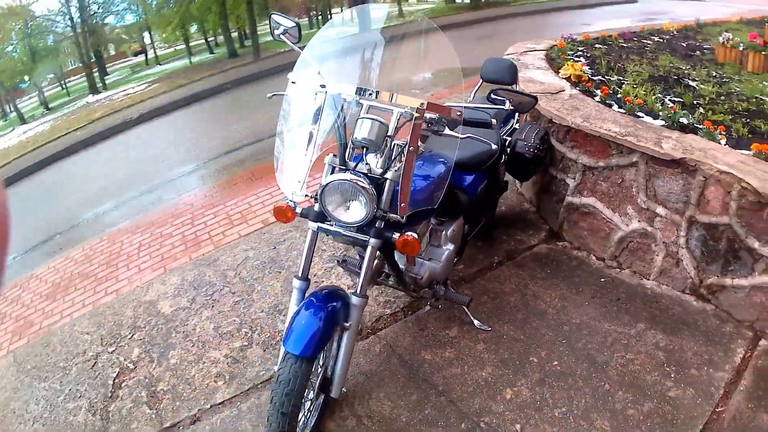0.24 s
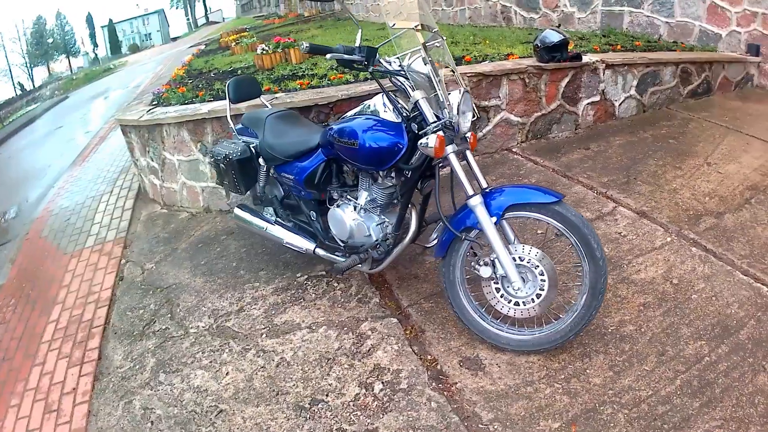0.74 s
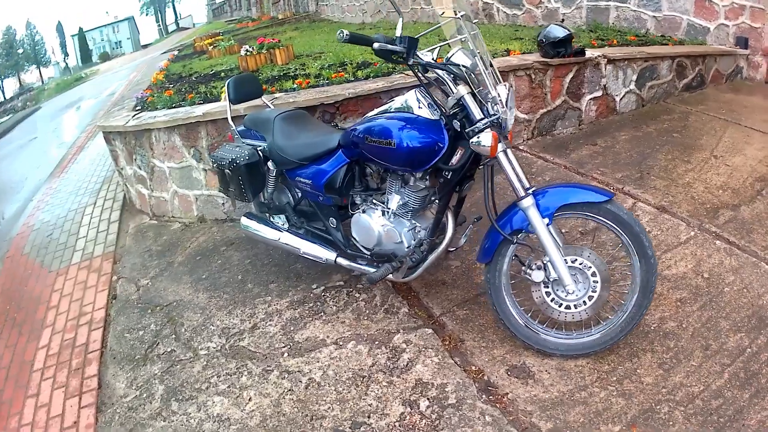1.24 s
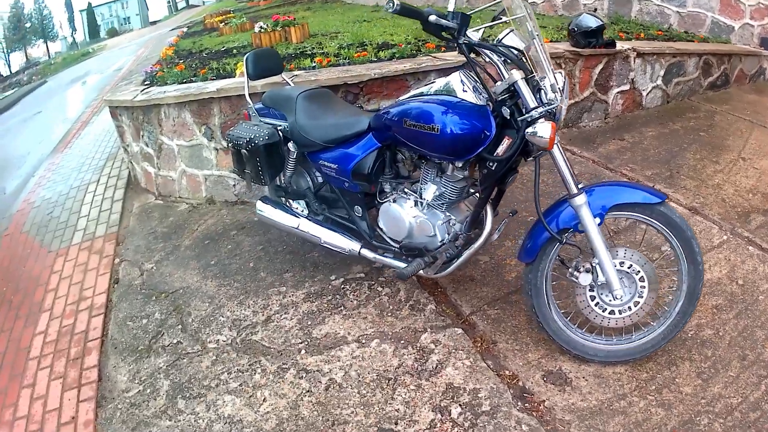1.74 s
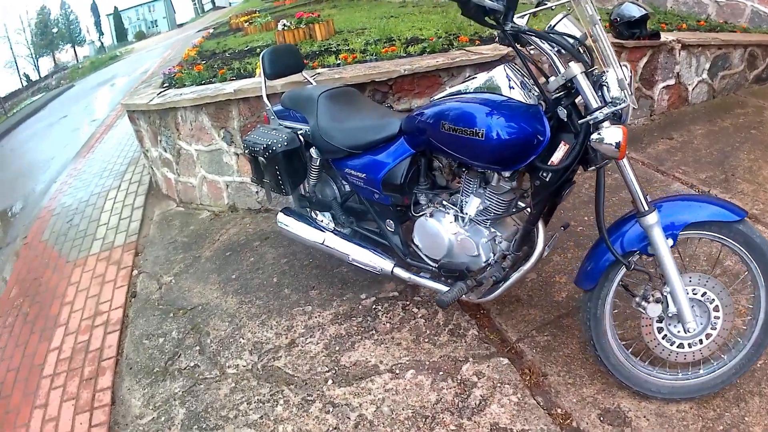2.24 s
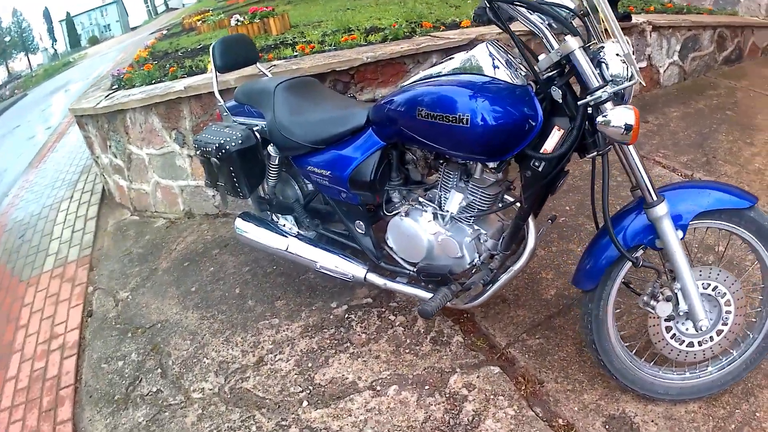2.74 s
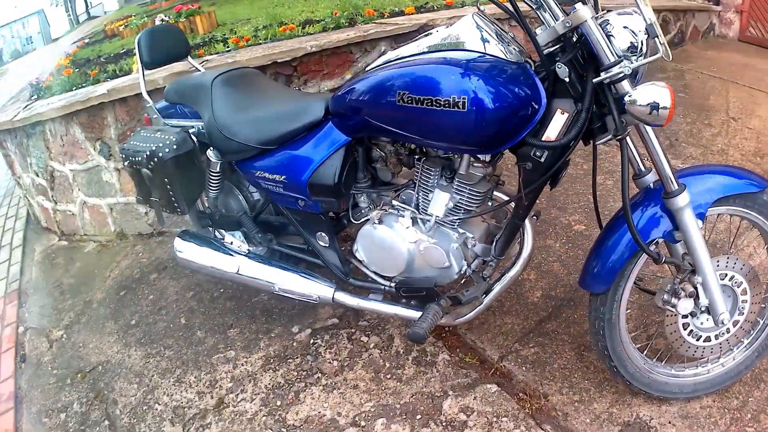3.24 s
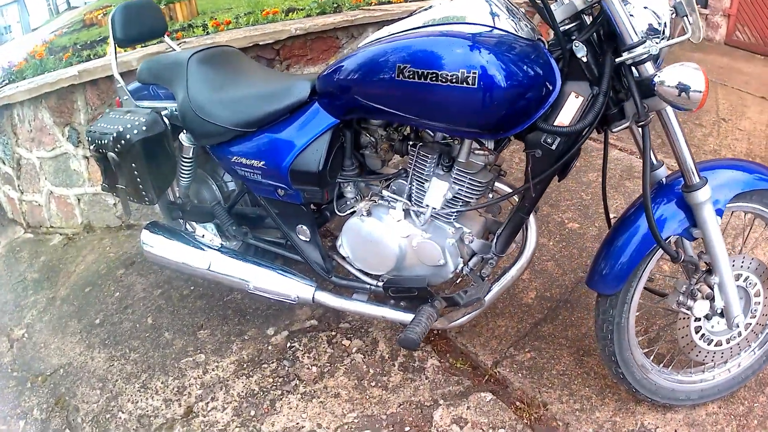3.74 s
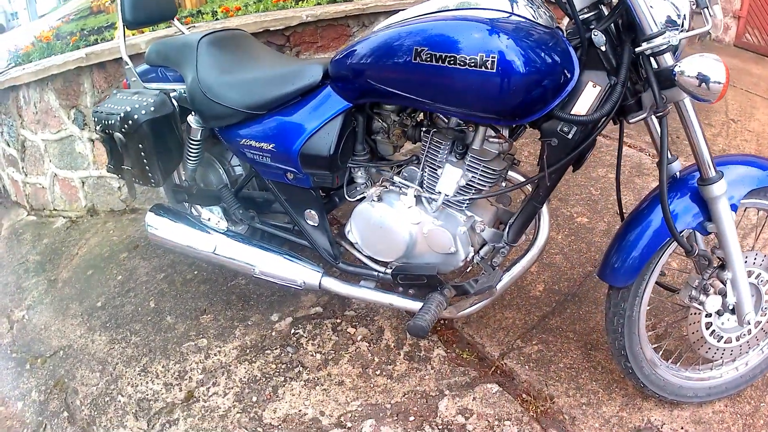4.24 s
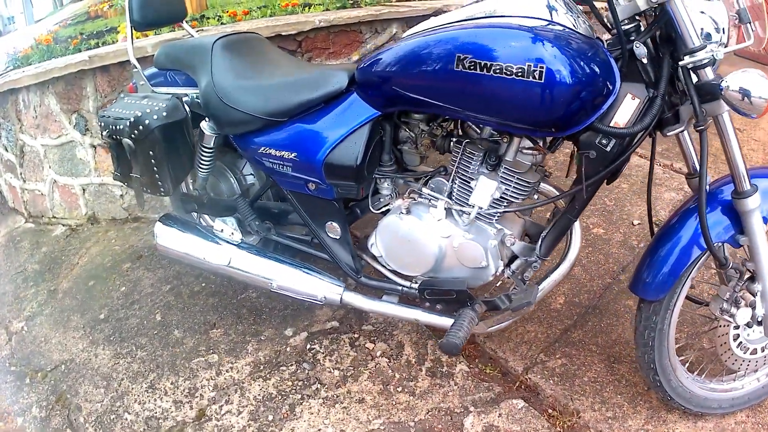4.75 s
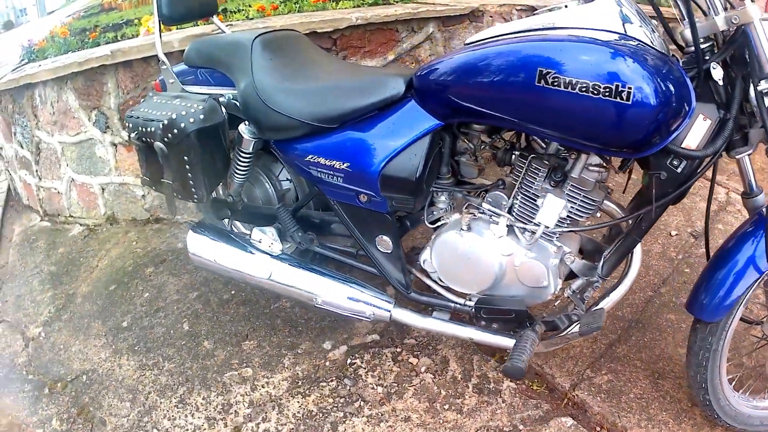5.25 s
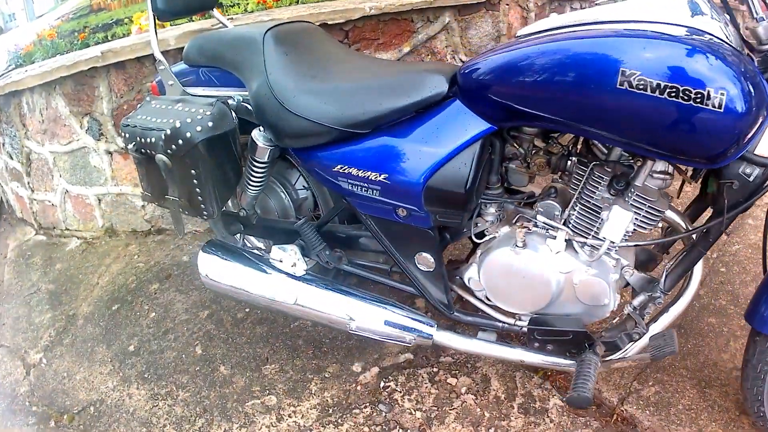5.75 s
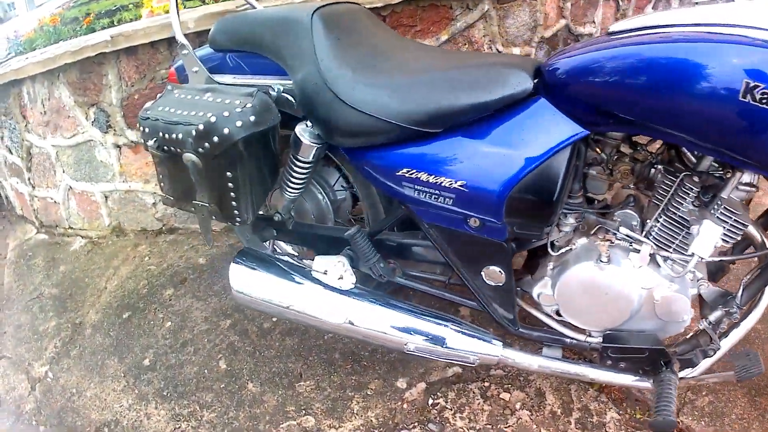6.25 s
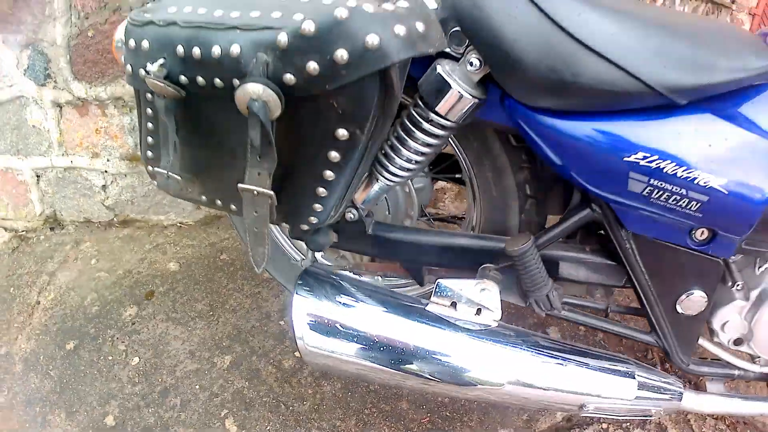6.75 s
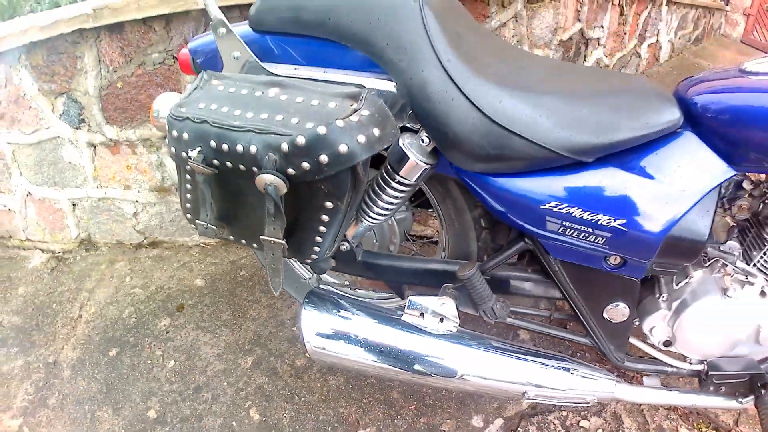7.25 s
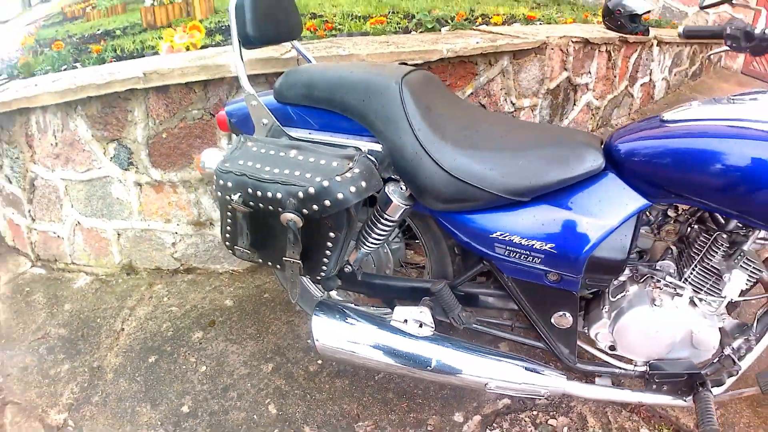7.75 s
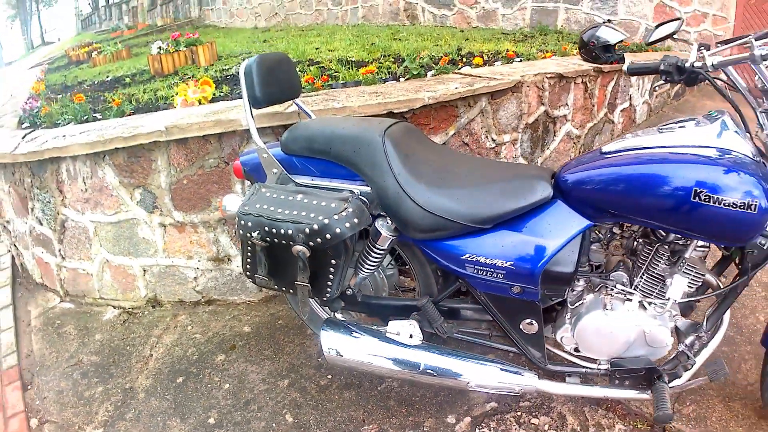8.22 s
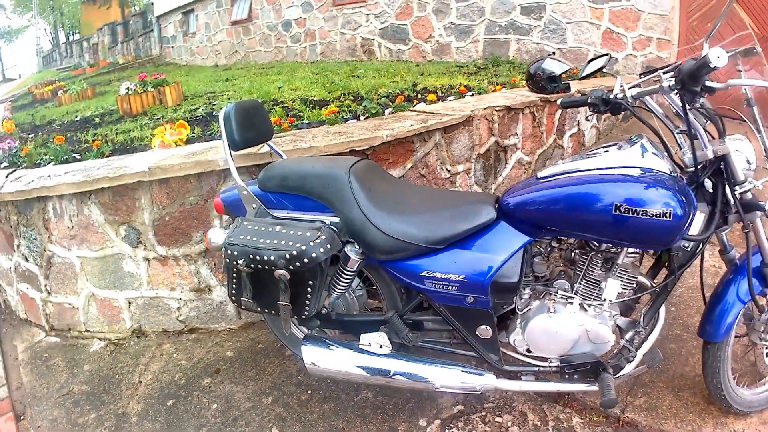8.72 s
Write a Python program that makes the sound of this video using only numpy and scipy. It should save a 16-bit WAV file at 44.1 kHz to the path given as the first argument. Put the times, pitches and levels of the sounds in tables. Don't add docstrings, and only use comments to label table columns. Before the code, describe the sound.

Close, muffled pickup of a single-cylinder engine ticking over evenly, about seventeen firings each second. Hollow plastic knocks, skin scrapes and sharp clicks interrupt between 1.7 and 3 seconds, peaking in a clipped thud. Low air pumping wavers underneath. The metallic clatter then comes forward with a faint gear whine; after a tiny gap at 6.6 seconds the tail side is heard, with more exhaust, and two light taps close to the end.

```python
import sys
import numpy as np
from scipy import signal
from scipy.fft import rfft, irfft, next_fast_len
from scipy.io import wavfile
from scipy.ndimage import uniform_filter1d, map_coordinates

SR = 44100
rng = np.random.default_rng(int(sys.argv[2]) if len(sys.argv) > 2 else 0)


def file_out(sig):
    cols = np.atleast_2d(sig).T
    lim = np.clip(cols, -1, 1)
    pcm = np.round(lim * 32767).astype(np.int16)
    wavfile.write(sys.argv[1], SR, pcm)


def amplitude_ratio(level_db):
    exponent = np.asarray(level_db, float) / 20
    return 10 ** exponent


N = 396016
T = np.arange(N) / SR

# time_s, firing_rate_hz
IDLE_SPEED = [
    [(0, 17.975), (.6, 17.684)],
    [(.55, 17.524), (1.3, 17.569), (1.9, 17.79), (2.3, 17.018), (2.75, 16.983), (3.1, 16.741),
     (3.9, 16.568), (4.5, 17.057), (5.5, 17.408), (5.9, 16.573), (6.65, 16.807)],
    [(6.6, 16.881), (7.1, 16.62), (7.7, 16.1), (8.4, 16.639), (9, 16.657)],
]
CRANK_START = [.77, .037, -.472]
# sound_stops_s, fade_in_starts_s
SCENE_CHANGES = [
    (.52127, .577),
    (6.60526, 6.661),
]
# delay_after_firing_ms, cover_blow_db, fin_blow_db
CYCLE_BLOWS = [(-4.5, -13.5, -3.5), (-3, 0, -0.5), (6, -8.5, -4.5), (15, -6.5, -1), (20, -8, -7.5),
               (31.5, -15, -7), (40, -14.5, -5.5)]
# time_s, cover_level_db, facing_ring_hz, bearing (0 front, 1 tail), air_box_gain_db
WALK = [(0, -57.5, 1780, 0.28, -3), (.45, -54.5, 1850, 0.43, -7.5), (.7, -51, 1940, 0.017, -1.5),
        (1.3, -54.5, 1915, 0.2, 2.5), (1.6, -49.5, 1572, 0.29, -1), (2.4, -53.5, 1840, 0.51, 2),
        (3.05, -44, 1680, 0.57, -1.5), (3.45, -51, 1755, 0.48, -1), (3.9, -46.5, 1620, 0.51, -8.5),
        (4.8, -45.5, 1663, .5, -6), (5.4, -48.5, 1618, 0.92, -9), (5.9, -49, 1737, 0.69, -7),
        (6.45, -49.5, 1984, 0.89, -11), (6.8, -43.5, 1540, 1, -3.5), (7.4, -48.5, 1680, 0.94, -10),
        (7.75, -51.5, 1755, 0.87, -1.5), (8.2, -50, 1776, 0.81, -1.5), (8.98, -51.5, 1740, 0.79, -1)]
# time_s, closing_blow_db, bare_clack_over_ring_db, fins_db
VIEW_ANGLE = [(0, -1, -9, -1), (.5, -6, -7, 0.5), (.9, -2, -5.5, -9.5), (1.5, -0.5, -10.5, -0.5),
              (2.4, -0.5, -5, 2.5), (3.2, 1, -7.5, -0.5), (3.7, 3.5, -12, -1), (4.2, 2.5, -14, -1.5),
              (5, 1.5, -7.5, 2.5), (5.7, 0.5, -5, 3), (6.1, 1.5, -1.5, 2.5), (6.55, 0, -0.5, 2.5),
              (6.8, -2, -4, 2), (7.2, -3.5, 1.5, 2.5), (7.7, 1.5, 0.5, 0.5), (8.3, 0, -3, -0.5),
              (8.98, -0.5, -5.5, 0)]
# pitch_hz, width_hz, level_db
HEAD_MODES = [(1759, 357, 0)]
# pitch_hz, width_hz, level_db
COVER_MODES = [(1520, 130, -10), (1680, 46, 15.5), (1863, 62, 12.5), (1880, 76, 9.5)]
# pitch_hz, width_hz, level_db
CRANKCASE_MODES = [(736, 170, -6), (1254, 198, 3), (1323.3, 190, 2), (2087, 84, -3)]
# pitch_hz, width_hz, level_db
FIN_MODES = [(2330, 230, -3.5), (2750, 140, 1), (3008, 180, 7.5), (3282, 180, 0), (3580, 37, 2),
             (3810, 250, -4), (3987, 370, -10.5)]
# pitch_hz, width_hz, level_db
SILENCER_MODES = [(78.4, 12, 4.5), (100.7, 17, 5), (215, 13, -32)]
# pitch_hz, width_hz, level_db
AIR_BOX_MODES = [(286.3, 70, 0)]
# time_s, upper_tooth_order_db, order_below_db
GEAR_WHINE = [(0, -79, -87), (2.9, -77, -82), (3.2, -68, -70), (3.55, -65, -70), (3.9, -75, -64.5),
              (4.15, -72, -69), (4.4, -67, -71), (4.8, -70.5, -78), (5.1, -78.5, -77.5), (5.6, -81, -80),
              (5.8, -65.5, -76), (6.1, -66, -71.5), (6.55, -61, -77), (6.7, -75, -75), (8.98, -81.5, -74)]
# pitch_hz, width_hz, level_db
TAILPIPE_MODES = [(233, 37, 0.5), (472, 58, -8.5), (670, 220, -12)]
# time_s, level_db
PUMPING = [(0, -32.5), (.3, -32), (.57, -26.5), (.75, -32.5), (1.2, -29), (1.5, -31.5), (2.17, -26),
           (2.55, -29), (2.95, -17.5), (3.25, -24), (3.9, -27), (5.3, -29.5), (6.5, -29.5), (6.8, -18),
           (7.2, -32), (7.55, -22.5), (8.3, -28.5), (8.98, -22)]
# frequency_hz, density_db
SLOSH_SPECTRUM = [(1.2, -32), (2.0, 4), (8, 4.5), (19, -2), (30, -7), (43, -14.5), (56, -17), (75, -25),
                  (150, -120)]
# frequency_hz, density_db
WHIRR_SPECTRUM = [(59, -23.5), (100, -10.5), (161, -16.5), (263, -24.5), (864, -33), (1410, -29.5),
                  (1710, -17), (2130, -30), (3120, -33), (4020, -39), (4420, -56.5), (5750, -87.5),
                  (9720, -120)]
# start_s, hollow_ring_db, panel_ring_db, face_ring_db, lid_ring_db
KNOCKS = [(0.2907, -49, -47.5, -58, -46), (1.1238, -48, -47, -42, -60), (1.4404, -46, -63, -49, -58),
          (1.499, -54, -66, -50, -60), (1.684, -63, -57, -47, -45), (1.733, -55, -39, -46, -50),
          (1.792, -41.5, -39.5, -37, -37), (1.8279, -28.5, -41, -14, -20), (2.097, -42.5, -51.5, -41, -36),
          (2.207, -25, -28.5, -12, -15.5), (2.297, -44, -48, -45.5, -36), (2.502, -46, -27, -16, -25.5),
          (2.7775, -46, -38.5, -32, -24), (2.786, -51, -42, -32, -28), (2.794, -54, -45, -29.5, -41.5),
          (2.802, -40, -44, -42, -34.5), (2.8818, -49, -44, -36, -22), (2.9045, -36, -48, -26, -30),
          (2.9675, -19, -30, -24, -40), (2.9887, -15, -35, -23, -29), (8.301, -51, -48, -49.5, -58),
          (8.799, -46, -43.5, -56, -56)]
# pitch_hz, level_db, share_of_t60
CASE_MODES = [(352, -15.5, 3.5), (639, 5, 1.15), (1318, -1, 1.05), (790, 3.5, 1.2), (1131, -10, 1.9),
              (1755, 1.5, 0.51), (1847, -3, 0.79), (2076, 6, 0.54), (2215, -3, 0.81), (2580, -19, 0.63),
              (3020, -13, 0.93), (3460, -16.5, 0.39), (3520, -19, 1.27), (3860, -20, 0.58)]
MODE_PART = [0, 0, 0, 1, 1, 2, 2, 3, 3, 3, 3, 3, 3, 3]
# frequency_hz, density_db
LOOSE_SPECTRUM = [(310, -29.5), (520, -6.5), (717, -0.5), (1030, -14.5), (1230, -3), (1470, -14),
                  (2080, -2.5), (2600, -22), (3710, -24.5), (4400, -52), (5720, -71.5), (9680, -120)]
# centre_s,
# signed_height, half_width_s
SQUEEZES = [(0.448, 0.27, 0.027), (0.519, -.14, 0.15), (1.856, -0.2, 0.0076), (2.099, -0.16, 0.0063),
            (2.119, 0.11, 0.013), (2.511, -0.15, 0.0091), (2.79, -0.18, 0.013), (2.89, -0.14, 0.028),
            (2.982, -0.058, 0.0095), (2.14, -0.13, .01), (2.165, 0.077, 0.03), (2.301, -0.11, .01),
            (2.459, 0.088, 0.023), (2.87, 0.16, 0.0092), (6.565, 0.14, 0.032), (6.6, -0.25, 0.015),
            (8.318, -0.11, 0.023), (8.77, -0.16, 0.019), (8.829, 0.12, 0.028), (8.895, -0.12, 0.026),
            (8.972, 0.066, 0.024)]
# peak_s, signed_height, fall_s
JOLTS = [(1.8303, 0.096, 0.019), (2.208, -0.32, 0.0085), (2.779, -0.0066, 0.0027), (2.88, -0.056, 0.0011),
         (2.908, 0.055, 0.0012), (2.9688, 0.25, 0.006), (2.9904, 0.44, 0.014), (5.153, -0.042, 0.003),
         (7.359, -.075, .003), (7.465, .05, .003), (7.612, -.022, .0033), (7.62, -.056, .0045),
         (8.302, -.13, .0014), (8.3052, 0.048, 0.0012), (8.328, -0.058, 0.0023), (8.8, 0.068, 0.0015)]
# centre_s, length_s, rasp_db, hollow_hum_db
SCRAPES = [(1.767, 0.27, -63, -59.5), (2.133, 0.078, -48, -65), (2.297, 0.092, -49.5, -59),
           (2.401, 0.1, -44.5, -64), (2.485, 0.068, -42.5, -51), (2.589, 0.095, -45, -50.5),
           (2.88, 0.027, -39, -53), (2.909, 0.031, -43, -41), (2.967, 0.06, -52, -44),
           (2.786, 0.027, -35.5, -38)]
# frequency_hz, density_db
RASP_SPECTRUM = [(240, -54), (400, -27), (800, -12), (1140, -4), (1830, 6), (2350, 2), (3300, -6),
                 (4300, -63), (5590, -120)]
# pitch_hz, width_hz, level_db
HUM_MODES = [(591, 50, -2.5), (775, 59, -3.5)]
# start_s, level_db, pitch_hz, t60_s
SNAPS = [(2.7785, -22, 790, .04), (2.783, -28, 2400, .03), (2.789, -26, 1700, .04), (2.794, -28, 2300, .03),
         (2.8815, -25, 1300, .008), (2.9045, -26, 1150, .03), (2.906, -21, 1620, .02),
         (2.9677, -4, 1600, .009), (2.5445, -33, 2200, .03), (2.912, -40, 3850, .09),
         (2.9895, -20, 660, .07), (2.1945, -33, 1850, .02)]
# start_s, level_db
NAIL_TICKS = [
    (2.5025, -42),
    (2.883, -28.5),
    (2.907, -39),
    (2.9905, -3),
    (8.3015, -53),
]
# centre_s, length_s, from_hz, to_hz
EMPTY_PATCHES = [(.13, .25, 3880, 4170), (.42, .17, 3880, 4170), (1.762, .04, 2050, 2750),
                 (1.792, .03, 2400, 2900), (1.775, .065, 1150, 1450), (1.768, .018, 600, 1150),
                 (1.775, .07, 3600, 3780), (1.775, .07, 3900, 4500), (2.16, .06, 3400, 4500),
                 (2.155, .05, 2400, 2620), (2.16, .04, 2780, 2980), (2.155, .05, 600, 1150),
                 (2.165, .03, 1350, 1520), (2.17, .02, 2000, 2300), (2.243, .018, 800, 1150),
                 (2.41, .055, 3200, 3500), (2.42, .02, 2300, 2700), (2.55, .045, 2400, 2620),
                 (2.525, .03, 3600, 4500), (2.8, .08, 3250, 4500), (2.83, .04, 2000, 2950),
                 (2.832, .04, 420, 1250), (2.855, .03, 3600, 4500), (2.938, .02, 420, 2150),
                 (2.94, .02, 2500, 4500), (2.926, .01, 2500, 3650), (2.96, .03, 3800, 4500),
                 (3.015, .02, 2100, 2800)]


def unit(x):
    return x / np.sqrt(np.mean(x ** 2) + 1e-20)


def levelled(x):
    return x / np.sqrt(uniform_filter1d(x ** 2, SR) + 1e-12)


def curves(rows):
    s, *columns = np.transpose(rows)
    return [np.interp(T, s, column) for column in columns]


def sway(swell_db=2, rate_hz=4):
    return swell_db * map_coordinates(rng.standard_normal(int(T[-1] * rate_hz) + 4), [T * rate_hz])


def filtered(x, response):
    m = next_fast_len(N + SR)
    return irfft(rfft(x, m) * response(np.fft.rfftfreq(m, 1 / SR)), m)[:N]


def rung(x, modes, order=1):
    def response(f):
        total = 0
        for k, (hz, width, db) in enumerate(modes):
            damping = 1j * f * width
            total = total + (-1) ** k * amplitude_ratio(db) * damping / (hz * hz - f * f + damping)
        return total ** order
    return filtered(x, response)


def noise(spectrum):
    hz, db = np.transpose(spectrum)
    shape = lambda f: amplitude_ratio(np.interp(np.log(f + 0.014), np.log(hz), db))
    return unit(filtered(rng.standard_normal(N), shape))


def spikes(s, size):
    keep = (s >= 0) & (s < T[-1])
    return np.bincount((s[keep] * SR).astype(int), size[keep], N)


def bursts(s, db, t60, loose):
    t = T[:SR // 10]
    shape = amplitude_ratio(-60 * t / t60) * (1 - np.exp(-t / 0.0019))
    hits = spikes(s, amplitude_ratio(db))
    jolt = signal.fftconvolve(hits, shape ** 2 * rng.standard_normal(len(shape)))[:N]
    rattle = signal.fftconvolve(hits, shape)[:N] * rng.standard_normal(N)
    return unit(jolt) + loose * unit(rattle)


def firings():
    t = np.arange(-100, 9100) / 1000
    ends = [SCENE_CHANGES[0][0], SCENE_CHANGES[1][0], T[-1]]
    fire = []
    for speed, start, end in zip(IDLE_SPEED, CRANK_START, ends):
        turns = np.cumsum(np.interp(t, *np.transpose(speed))) / 1000
        turns = turns - np.interp(speed[0][0], t, turns) + start
        times = np.interp(np.arange(200), turns, t, right=99)
        fire.append(times[times < end])
    return np.concatenate(fire)


def valve_gear(fire, luck, bearing):
    cover_db, ring_hz, _, _ = curves(WALK)
    closing_db, bare_db, fins_db = curves(VIEW_ANGLE)
    cover_db = cover_db + sway()
    fins_db = -61 + fins_db + sway()
    ms, cover_blow, fin_blow = np.transpose(CYCLE_BLOWS)
    when = (fire[:, None] + ms / 1000 + 0.00008 * luck[..., 0]).ravel()
    late_db = 0.5 * np.interp(fire, T, bearing)[:, None] ** 2 * (ms > 25)
    valve_db = np.interp(fire, T, closing_db)[:, None] * ((ms > 10) & (ms < 25))
    blow_db = cover_blow + late_db + valve_db + 1.2 * luck[..., 1]
    blows = bursts(when, blow_db.ravel(), t60=0.014, loose=0.22)
    head = rung(blows, HEAD_MODES, order=2)
    cover = sum(np.exp(-((ring_hz - mode[0]) / 165) ** 2) * rung(head, [mode]) for mode in COVER_MODES)
    cover = levelled(levelled(cover) + amplitude_ratio(bare_db) * unit(head))
    rumble = blows + 1.9 * rng.standard_normal(N)
    crankcase = amplitude_ratio(-16) * unit(rung(rumble, CRANKCASE_MODES, order=2))
    fin_hits = bursts(when, (fin_blow + 0.4 * luck[..., 2]).ravel(), t60=0.028, loose=2.4)
    fins = unit(rung(fin_hits, FIN_MODES))
    return amplitude_ratio(cover_db + 1.5) * (cover + crankcase) + amplitude_ratio(fins_db) * fins


def exhaust_thump(fire, luck, bearing):
    echo_s, echo_db = 0.02, -7.5
    pulses = 0
    for delay_s, db in [(0, 0), (echo_s, echo_db)]:
        pulses = pulses + spikes(fire - 0.002 + delay_s, -amplitude_ratio(db + 1.7 * luck[:, 0, 0]))
    low = unit(filtered(rung(pulses, SILENCER_MODES), lambda f: 1 / (1 + 1j * f / 150)))
    return amplitude_ratio(-52 + 10 * bearing + sway()) * low


def intake_gulp(fire, luck):
    _, _, _, view_db = curves(WALK)
    gulp_db = -3 * (np.arange(len(fire)) % 2) + 1.5 * luck[:, 1, 0]
    gulp = unit(rung(spikes(fire - 0.0008, amplitude_ratio(gulp_db)), AIR_BOX_MODES, order=2))
    draw = 0.35 * unit(rung(rng.standard_normal(N), AIR_BOX_MODES, order=2))
    return amplitude_ratio(-58.5 + view_db + sway()) * (gulp + draw)


def gear_whine(speed):
    teeth, blur_rad = 38, 0.44
    mesh = 2 * np.pi * teeth * np.cumsum(uniform_filter1d(speed, SR // 5)) / SR
    shake = map_coordinates(rng.standard_normal((2, 400)), [[0 * T, 0 * T + 1], [40 * T, 40 * T]])
    out = np.zeros(N)
    for k, db in enumerate(curves(GEAR_WHINE)):
        phase = mesh * (1 - k / teeth) + blur_rad * shake[1]
        out += amplitude_ratio(db + 2.5 + 1.5 * shake[0]) * np.sin(phase)
    return out


def tailpipe_chuff(fire, luck, bearing):
    puffs = bursts(fire, 3.1 * luck[:, 2, 0], t60=0.13, loose=10)
    return amplitude_ratio(-71 + 15 * bearing) * unit(rung(puffs, TAILPIPE_MODES))


def engine():
    _, _, bearing, _ = curves(WALK)
    fire = firings()
    speed = np.interp(T, fire[1:], 1 / np.diff(fire))
    fire = fire + 0.00054 * rng.standard_normal(len(fire))
    luck = np.clip(rng.standard_normal((len(fire), len(CYCLE_BLOWS), 3)), -1.6, 1.6)
    metal = valve_gear(fire, luck, bearing) + gear_whine(speed)
    gas = exhaust_thump(fire, luck, bearing) + intake_gulp(fire, luck) + tailpipe_chuff(fire, luck, bearing)
    return metal + gas


def pushes():
    out = [(s, height, width, width) for s, height, width in SQUEEZES]
    for k in range(4):
        out.append((3.016 + k * 0.0363, 0.46 * (-0.65) ** k, 0.014, 0.014))
    for s, height, fall in JOLTS:
        rise = 0.00085 if abs(height) > 0.1 else 0.43 * fall
        out.append((s, height, rise, fall))
    return out


def air():
    coarse = T[::64]
    push_nearness = np.max([np.exp(-((coarse - s) / 0.035) ** 2) for s, *_ in pushes()], axis=0)
    pumping = amplitude_ratio(curves(PUMPING)[0]) * (1 - 0.85 * np.interp(T, coarse, push_nearness))
    return pumping * noise(SLOSH_SPECTRUM) + amplitude_ratio(-51) * noise(WHIRR_SPECTRUM)


def add_at(out, s, sound):
    out[round(s * SR):][:len(sound)] += sound


def knocks():
    t60, loose_db = 0.035, 1
    out, t, loose = np.zeros(N), T[:SR // 8], noise(LOOSE_SPECTRUM)
    onset = 1 - np.exp(-t / 0.0013)
    luck = rng.standard_normal((len(KNOCKS), len(CASE_MODES), 2)) * [2, 0.008]
    for (s, *part_db), row in zip(KNOCKS, luck):
        ring = 0
        for (hz, db, share), part, (luck_db, detune) in zip(CASE_MODES, MODE_PART, row):
            decay = amplitude_ratio(db + part_db[part] + luck_db - 60 * t / (t60 * share))
            ring = ring + decay * np.sin(2 * np.pi * hz * (1 + detune) * t)
        clatter = amplitude_ratio(loose_db + max(part_db) - 60 * t / (0.47 * t60)) * loose[round(s * SR):][:len(t)]
        add_at(out, s, (ring + clatter) * onset)
    return out


def sealed_air():
    out = np.zeros(N)
    for s, height, rise, fall in pushes():
        out += height * np.exp(-((T - s) / np.where(T < s, rise, fall)) ** 2)
    return out


def scrapes():
    stroke, drag = np.zeros(N), np.zeros(N)
    for s, length, rasp_db, hum_db in SCRAPES:
        shape = np.exp(-(2 * (T - s) / length) ** 4)
        stroke += amplitude_ratio(rasp_db) * shape
        drag += amplitude_ratio(hum_db) * shape
    grit = amplitude_ratio(3.1 * uniform_filter1d(rng.standard_normal(N), 60) * np.sqrt(60))
    rasp = unit(grit * noise(RASP_SPECTRUM))
    hum = unit(rung(rng.standard_normal(N), HUM_MODES))
    return stroke * rasp + drag * hum


def snaps():
    out, t = np.zeros(N), T[:SR // 8]
    for s, db, hz, t60 in SNAPS:
        add_at(out, s, amplitude_ratio(db - 60 * t / t60) * np.sin(2 * np.pi * hz * t) * (1 - np.exp(-t / 0.0004)))
    return out


def nail_ticks():
    out, t = np.zeros(N), T[:SR // 8]
    for s, db in NAIL_TICKS:
        add_at(out, s, amplitude_ratio(db - 60 * t / 0.0092) * np.diff(rng.standard_normal(len(t) + 1)))
    return out


def scene():
    handling = knocks() + sealed_air() + scrapes() + snaps() + nail_ticks()
    return (engine() + air() + handling)[None]


def sparse(x, bar_db):
    hz, s, z = signal.stft(x, SR, "cosine", nperseg=1536)
    edges = np.unique(np.geomspace(12, len(hz), 105).astype(int))
    band = np.searchsorted(edges, np.arange(len(hz)), "right")
    power = [np.mean(abs(z[band == b]) ** 2, axis=0) for b in range(band.max())]
    power = np.array(power + [0 * s])
    low_hz = np.append(0, hz[edges[:-1]])[:, None]
    uneven_db = 5 * unit(uniform_filter1d(rng.standard_normal(power.shape), size=2, axis=1))
    raised_db = 5 * ((low_hz > 3150) & (low_hz < 3780))
    lowered_db = 12 * (low_hz > 4080)
    threshold = amplitude_ratio(2 * (bar_db + raised_db - lowered_db + uneven_db))
    keep = (power > threshold) | (low_hz == 0)
    keep = keep[band]
    for mid, length, low, high in EMPTY_PATCHES:
        keep[np.ix_((hz > low) & (hz < high), abs(s - mid) < length / 2)] = False
    return signal.istft(z * keep, SR, "cosine", nperseg=1536)[1][:N]


def top_cut(x):
    return signal.sosfilt(signal.butter(12, 16400, fs=SR, output="sos"), x)


def record(dry):
    muffled = filtered(dry[0], lambda f: 1 / (1 + (f / 4330) ** 40))
    x = np.clip(sparse(muffled, bar_db=-90), -0.67, 0.67)
    for stop, back in SCENE_CHANGES:
        fade_in = np.clip((T - back) / 0.021, 0, 1)
        x = x * np.where(T < stop, 1, fade_in)
    return top_cut(x[None])


dry = scene()
out = record(dry)
file_out(out)
```